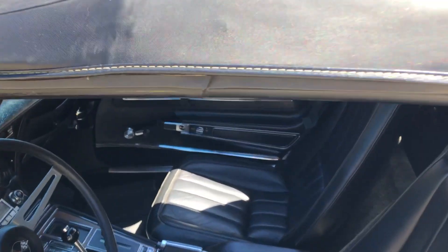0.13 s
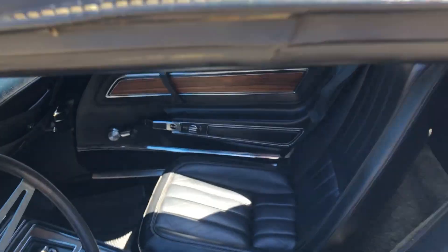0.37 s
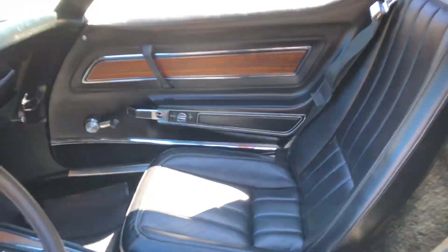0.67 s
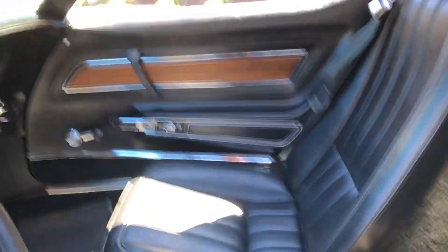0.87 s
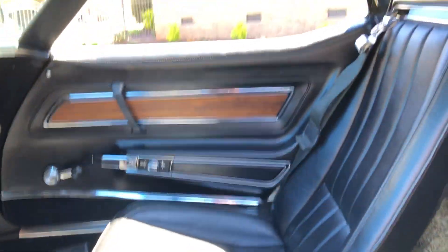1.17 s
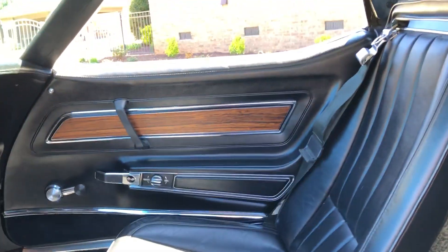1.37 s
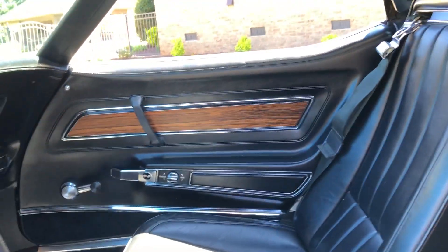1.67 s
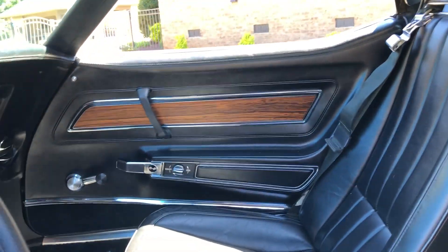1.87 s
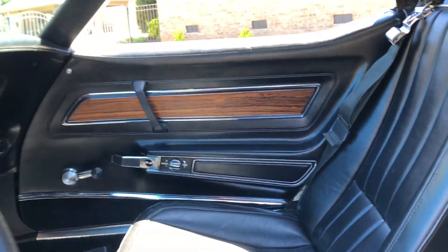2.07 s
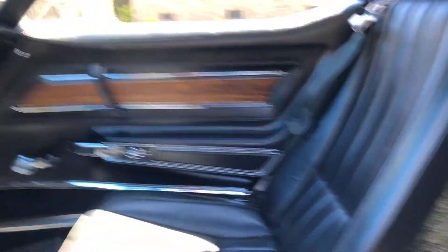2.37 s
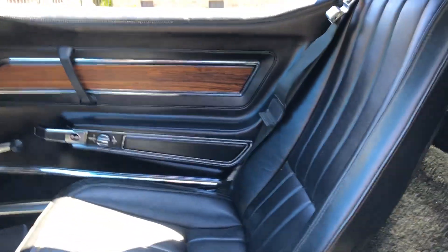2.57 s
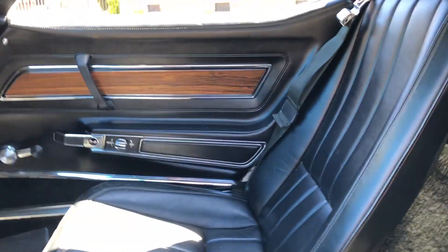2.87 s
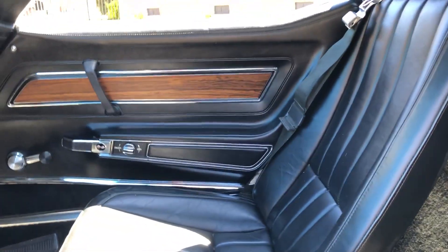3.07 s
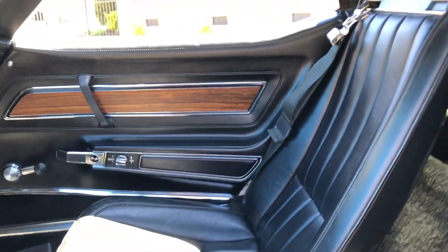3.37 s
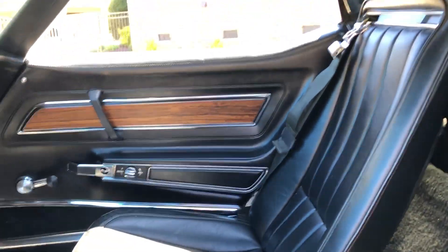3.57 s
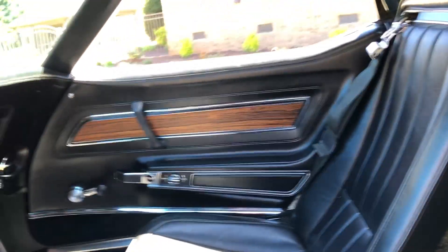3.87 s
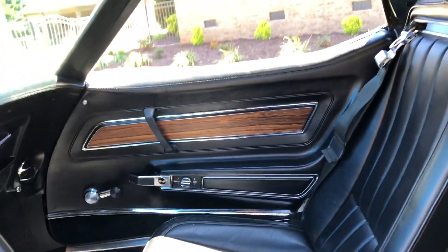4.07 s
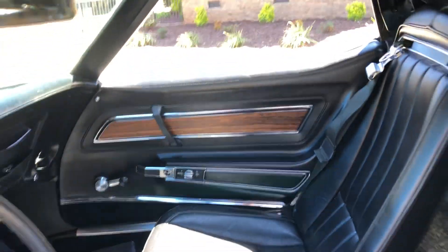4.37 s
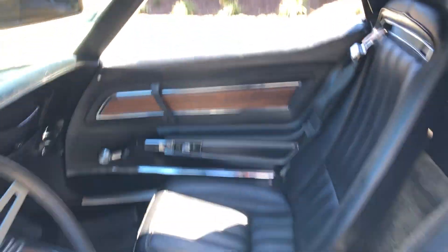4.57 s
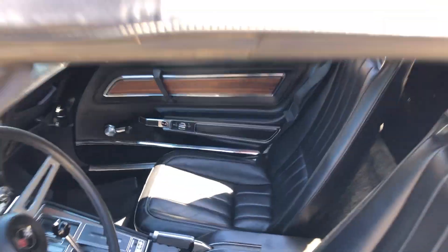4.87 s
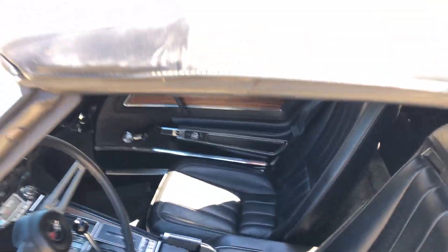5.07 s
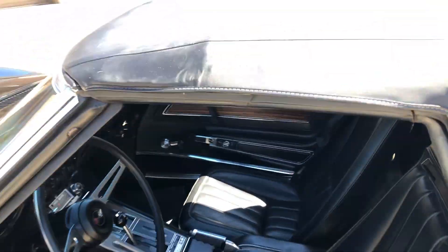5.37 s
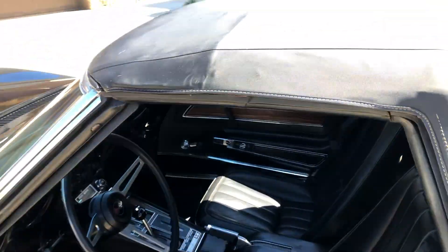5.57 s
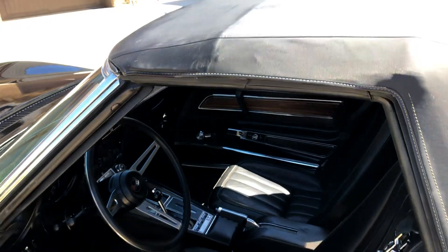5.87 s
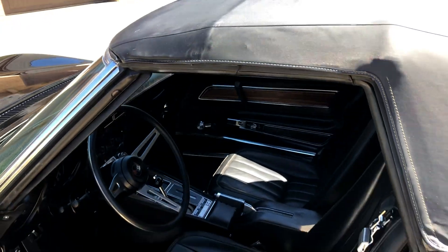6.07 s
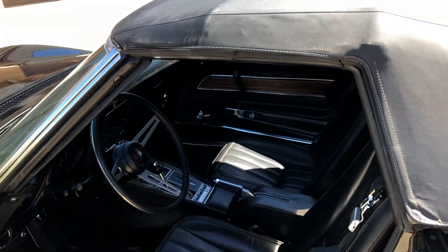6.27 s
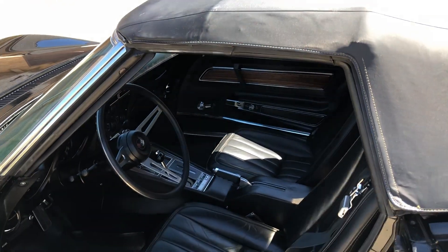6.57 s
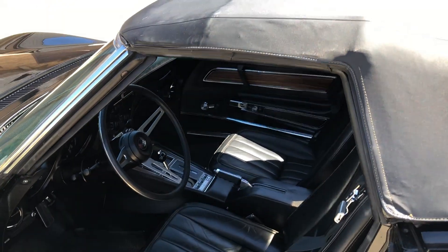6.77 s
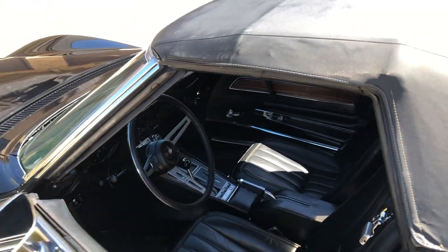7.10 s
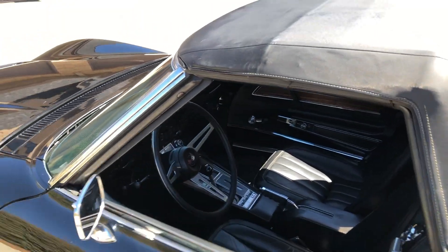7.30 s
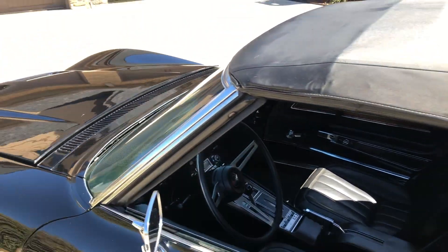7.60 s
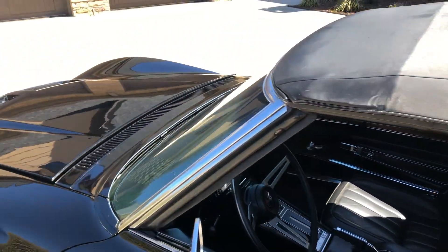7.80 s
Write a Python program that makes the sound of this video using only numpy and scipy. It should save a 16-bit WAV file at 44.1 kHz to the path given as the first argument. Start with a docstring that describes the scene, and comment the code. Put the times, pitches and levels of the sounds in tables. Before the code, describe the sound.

Close small ticks over far traffic rumble, a clattering car door release, faint distant chirps, and finally a loud, heavy door slam.

```python
"""A yard outdoors with hard ground and walls: a heavy car door stands close to the microphone.
Its latch is worked and released, later it is slammed: noise bursts and short notes through resonances.
Hands and feet nearby make small ticks, a fine crackle and a rub; the walls add a short tail.
Far traffic and hiss are shaped noise, a motor hums in sine overtones, an engine pulls away as a
climbing sine, and a small distant bird chirps in arched, roughened whistles."""
import sys
import numpy as np
from scipy import signal
from scipy.fft import rfft, irfft, next_fast_len
from scipy.io import wavfile
from scipy.ndimage import uniform_filter1d, map_coordinates

SR = 44100
rng = np.random.default_rng(int(sys.argv[2]) if len(sys.argv) > 2 else 0)


def int16_out(signal):
    """Quantize to a 16-bit WAV file."""
    q = np.round(np.clip(np.atleast_2d(signal).T, -1, 1) * 32767)
    wavfile.write(sys.argv[1], SR, q.astype(np.int16))


N = 350154  # samples

# Far background. Each row: time in seconds, rumble level in dB, traffic level in dB, hiss level in dB.
AIR_LEVELS = [(0, -51.5, -57.5, -83.5), (.41, -49, -58, -72.5), (.6, -52, -59, -70), (.72, -51, -59.5, -65),
              (1.02, -53.5, -63, -61), (1.41, -55, -63, -68.5), (1.8, -55.5, -66, -77),
              (2.24, -56.5, -62, -70), (2.45, -55, -65.5, -70.5), (3.7, -54.5, -69.5, -74),
              (4.3, -57.5, -66, -69.5), (4.78, -54, -61.5, -70.5), (4.95, -53.5, -64, -75.5),
              (6, -52, -61.5, -77.5), (6.33, -51, -60, -74.5), (6.75, -52, -61, -77.5),
              (7.2, -49, -62, -78.5), (7.4, -52, -60, -77)]
# Spectra of its three layers. Each row: frequency in Hz, relative density in dB per Hz.
RUMBLE_SPECTRUM = [(13, -24.5), (22, -8.5), (75, 0), (97, -3), (150, 0.5), (258, -10), (340, -8),
                   (391, -19.5), (494, -18.5), (600, -29.5), (780, -31.5), (1320, -120)]
TRAFFIC_SPECTRUM = [(210, -37.5), (350, -4.5), (500, -7.5), (665, -4.5), (917, -4), (1040, -6), (1160, -9),
                    (1780, -9.5), (6000, -31), (7800, -56.5), (13200, -120)]
HISS_SPECTRUM = [(1470, -29), (2500, -4), (3590, 2.5), (4360, -1.5), (6410, -0.5), (10100, -3.5),
                 (15100, -6.5), (15800, 0)]

# Overtones of the motor. Each row: multiple of the hum frequency, level in dB before the hum's gains.
HUM_OVERTONES = [(1, -65.5), (4, -78.5), (5, -76.5), (6, -89.5)]
HUM_HZ = 292
# the hum comes forward once
HUM_START_S, HUM_RISE_S, HUM_FAINT_DB, HUM_FULL_DB = 4.3, 0.55, -7, 3.5

# Ticks and scuffs close by. Each row: start in seconds, strength in dB, low part in dB relative to it,
# ring frequency in Hz, t60 of the grit in seconds.
TICKS_NEARBY = [(.2438, -41, -1, 1920, 0.098), (0.3232, -48.5, -12, 4240, 0.093),
                (0.4998, -44.5, -13, 1600, 0.052), (0.6974, -33.5, -8, 2330, 0.031),
                (2.14, -47.5, -1, 2130, 0.034), (2.216, -54, 7, 620, 0.038), (2.2425, -55, 9, 2600, 0.059),
                (3.59, -53, 1.5, 2220, 0.33), (3.6135, -54, -3, 1850, 0.05), (3.6796, -53, -21, 1880, 0.23),
                (3.7717, -48, -22, 3960, 0.086), (4.1904, -54, -23, 2390, .06),
                (4.332, -57, -17, 4060, 0.11), (4.4532, -49.5, -23, 2170, 0.072),
                (4.61, -53, -12, 1760, 0.04), (4.757, -54, -14, 2250, .13), (4.7894, -54.5, -10, 1450, .12),
                (4.847, -49.5, -20, 2320, 0.27), (4.8785, -37, -1.5, 1270, 0.057),
                (5.2413, -49, -10, 1750, 0.15), (5.2587, -41.5, -6, 1590, 0.042),
                (5.3704, -58, -17, 1430, 0.15), (5.742, -54.5, 6, 1350, .088),
                (5.9499, -62.5, 21.5, 820, 0.036), (6.1327, -47.5, 3.5, 1630, 0.06),
                (6.345, -38, -8, 2040, 0.082), (6.3903, -51, -20, 1910, 0.11),
                (6.6339, -38.5, -12, 1880, 0.066)]
# grit, fizz and ring are relative to the strength of the tick
TICK_RISE_S, TICK_GRIT_DB, TICK_FIZZ_DB, TICK_RING_DB = 0.0042, -5.5, -18.5, -6

# Decay of the yard's tail. Each row: frequency in Hz, t60 in seconds.
YARD_DECAY = [(100, 0.54), (1000, 0.56), (4000, 0.33), (12000, 0.23)]

# Door contacts. Each row: start in seconds, strength in dB, metal relative to panel in dB, fine rattle
# relative to metal in dB, t60 of the latch rattle in seconds, clack in Hz, knock in Hz.
DOOR_CONTACTS = [(2.249, -46, -20, -20, 0.052, 1050, 380), (2.5044, -49.5, 15, -28, 0.022, 2030, 510),
                 (2.522, -41.5, 8, -13.5, 0.096, 1670, 655), (2.58, -53, 17.5, -17, .11, 3200, 490),
                 (2.6032, -49, 7, -12, .16, 1850, 650), (2.656, -51, 8, -22, 0.089, 1860, 640),
                 (2.7037, -42.5, 11, -37, 0.06, 2110, 670), (2.73, -39.5, 9, -31, 0.17, 2020, 715),
                 (2.7484, -19.5, 8, -16, 0.063, 2040, 713), (2.7603, -18.5, -15, -10, 0.027, 2300, 500),
                 (2.8097, -28.5, 7.5, -28, 0.097, 2090, 500), (2.8239, -32, 9.5, -22, 0.094, 1550, 690),
                 (2.8451, -30, 4.5, -35, 0.083, 3330, 726), (2.8713, -43.5, 4.5, -16, 0.4, 1730, 575),
                 (3.0714, -43, -12.5, -22, 0.19, 1890, 415), (3.1332, -46, -4, -3, 0.18, 2260, 760),
                 (3.1643, -36.5, 6.5, -8, 0.2, 1980, 587), (3.1695, -24.5, 0.5, -8.5, 0.062, 5450, 724),
                 (3.2053, -31.5, 1.5, -20, 0.026, 2220, 619), (3.25, -44, 10, -33, 0.027, 2010, 660),
                 (7.087, -41.5, 12.5, -19, 0.044, 1545, 1052), (7.099, -41, -14, -20, 0.078, 1500, 715),
                 (7.184, -36, -27, -32, .061, 1950, 492), (7.2048, -40.5, -26, -20, 0.06, 1573, 457),
                 (7.431, -45, -16.5, -26, 0.078, 1750, 493), (7.479, -39.5, 14.5, -12.5, 0.041, 1710, 1185),
                 (7.494, -18.5, 5.5, -23, 0.25, 2520, 933), (7.5112, -12, 13.5, -14.5, 0.066, 2590, 563),
                 (7.5216, -21, 9.5, -4.5, .052, 1604, 543), (7.5338, -18, -7.5, -11.5, 0.092, 1630, 488),
                 (7.5463, -16, 9, -8.5, 0.051, 2550, 885), (7.5563, -13, -5, -7, .057, 1453, 390),
                 (7.564, -27, 2, -3.5, 0.11, 1630, 715), (7.593, -20, 4.5, -12.5, 0.11, 1880, 447),
                 (7.6177, -26, 0.5, -16, .09, 1588, 461), (7.648, -28, -1, -12, .05, 1900, 448)]
RATTLE_DB, CLACK_DB = -12, -10  # latch rattle and latch note relative to the metal level
# Resonances of the outer panel. Each row: frequency in Hz, width in Hz, level in dB.
PANEL_MODES = [(530, 67, 5.5), (699, 150, -11), (911, 38, -21), (1249, 80, -8.5), (1433, 46.5, -10.5),
               (1462, 23, -9.5)]
# Resonances of latch and rods. Each row: frequency in Hz, width in Hz, level in dB.
METAL_MODES = [(2000, 200, -4), (2300, 150, -2), (2600, 200, -3), (3330, 200, -6), (4330, 250, -7),
               (4950, 400, -1), (5980, 250, -6)]
# Resonances of springs and pins. Each row: frequency in Hz, width in Hz, level in dB.
FINE_MODES = [(6900, 400, -1), (10200, 800, -2), (11600, 400, -9)]
# after the release a loose rod chatters evenly and fades; the loss is per knock
CHATTER_S, CHATTER_GAP_S, CHATTER_DB, CHATTER_LOSS_DB = 2.9055, 0.0457, -32, 2
CHATTER_METAL_DB, CHATTER_FINE_DB = 3, -40
CHATTER_T60_S, CHATTER_CLACK_HZ, CHATTER_KNOCK_HZ = 0.084, 2150, 628

# Shell and cabin resonances, the deepest first. Each row: frequency in Hz, width in Hz, level in dB.
BODY_MODES = [(54, 69, 17), (134, 26, 8), (165.6, 44, 5), (190.4, 10, -2), (265, 21, -6), (310, 31, -14),
              (322, 32, 0.5)]
# Heavy blows into the shell. Each row: start in seconds, push in dB before a small random change.
SHELL_THUMPS = [(2.7627, -34), (2.8119, -33.5), (2.8241, -30.5), (2.8713, -36), (2.9506, -40),
                (2.9973, -42), (3.166, -34), (7.106, -47.5), (7.2044, -45), (7.436, -47), (7.5107, -28),
                (7.5204, -22), (7.533, -20), (7.5468, -26), (7.5549, -16), (7.562, -16.5), (7.5844, -18.5),
                (7.6193, -28.5)]
# The door shakes after a jolt and sways on. Each row: start in seconds, jolt in dB, sway in dB,
# time in seconds before the sway falls off.
DOOR_SHUDDER = [(2.74, -29.5, -37, 0.44), (7.601, -14, -48.5, 0.28)]
DEEP_DB = -24.5  # push into the cabin's lowest note for a blow of -19.5 dB
DEEP_GROWS = 1.8  # dB for each dB of the blow
JOLT_DB_PER_S, SWAY_DB_PER_S, SHAKE_RISE_S = 220, 97, 0.018
SWAY_DEEP_DB = -9  # share of the swaying that reaches the cabin's lowest note
# a low note hums on once the door swings free
LOW_S, LOW_HZ, LOW_DB, LOW_T60_S = 3.2, 75, -47, 1.9

# a short run of very fine, thin ticks
CRACKLE_S, CRACKLE_GAP_S, CRACKLE_DB, CRACKLE_T60_S = 4.109, 0.0445, -58, 0.053

# Chirps of the far bird. Each row: start in seconds, top frequency in Hz, level in dB, length in seconds.
BIRD_CHIRPS = [(4.193, 3360, -71, 0.043), (4.447, 3400, -65, 0.039), (4.52, 3310, -75, 0.035),
               (4.604, 2090, -66, 0.046), (4.686, 3280, -67, 0.034), (4.75, 3300, -70, 0.036),
               (4.933, 3300, -62.5, .04), (5.0, 3250, -68, .035), (5.115, 1980, -64, 0.044)]

ENGINE_S, ENGINE_LASTS_S, ENGINE_HZ, CLIMB_HZ_PER_S = 5.5, 1.15, 67, 28
ENGINE_DB, ENGINE_FADE_DB_PER_S, ENGINE_ATTACK_S, ENGINE_RELEASE_S = -49.5, 8.5, 0.12, 0.2

RUB_S = 6.912  # a hand slides along the door, loudest here
RUB_DB, RUB_METAL_DB, RUB_RISE_DB_PER_S, RUB_FALL_DB_PER_S = -55.5, -13.5, 93, 119.5

TOP_HZ = 15900  # band limit of the microphone


def amp(db):
    """Gain of a level in dB."""
    return 10 ** (np.asarray(db) / 20)


def unit(x):
    """x at rms 1."""
    return x / np.sqrt(np.mean(x ** 2) + 1e-20)


def along(points, hz):
    """Read (Hz, value) points on a log frequency axis."""
    f, v = np.transpose(points)
    return np.interp(np.log(hz + 1), np.log(f + 1), v)


def curves(rows):
    """One value per sample for each column after the time."""
    s, *columns = np.transpose(rows)
    return [np.interp(np.arange(N) / SR, s, column) for column in columns]


def wobble(rate):
    """A smooth random curve, rate knots a second."""
    knots = rng.standard_normal(int(N * rate / SR) + 4)
    return map_coordinates(knots, [np.arange(N) * rate / SR])


def filtered(x, response):
    """x through a complex response of frequency, padded so that no ringing wraps round."""
    m = next_fast_len(N + SR)
    return irfft(rfft(x, m) * response(np.fft.rfftfreq(m, 1 / SR)), m)[..., :N]


def peak(f, hz, width):
    """One causal resonance of top gain 1."""
    return 1j * f * width / (hz * hz - f * f + 1j * f * width)


def band(lo_hz, hi_hz, modes):
    """A broad causal band with sharper resonances on it, scaled so that white noise keeps its rms."""
    def response(f):
        broad = peak(f, np.sqrt(lo_hz * hi_hz), hi_hz - lo_hz)
        sharp = sum(amp(db) * peak(f, hz, width) for hz, width, db in modes)
        whole = broad * broad * (broad + sharp)
        return whole / np.sqrt(np.mean(np.abs(whole) ** 2))
    return response


def add(track, s, x):
    """Mix x into track at second s."""
    i = round(s * SR)
    track[..., i:i + x.shape[-1]] += x[..., :N - i]


def burst(t60, rise, grit_db):
    """A contact: a clump of tiny impacts that sets in fast and dies away."""
    t = np.arange(SR // 3) / SR
    steps_db = np.repeat(rng.standard_normal(len(t) // 49 + 1), 49)[:len(t)]  # a new gain every 49 samples
    noise = amp(grit_db * steps_db) * rng.standard_normal(len(t))
    return unit(noise) * amp(-60 * t / t60) * (1 - np.exp(-t / rise))


def ring(hz, t60):
    """The short, slightly blurred note of one struck part: a dying sine of drifting phase."""
    t = np.arange(SR // 10) / SR
    blur = np.cumsum(rng.normal(0, 0.06, len(t)))
    return amp(-60 * t / t60) * np.sin(2 * np.pi * hz * t + blur) * (1 - np.exp(-t / 0.00041))


def voiced(drive, panel=(), metal=(), fine=()):
    """Forces in a low, a middle and a fine range, each through its own resonances."""
    low = filtered(drive[0], band(269.6, 2070, panel))
    middle = filtered(drive[1], band(990, 7500, metal))
    return low + middle + filtered(drive[2], band(4500, 15000, fine))


def rush(spectrum, patchy_db):
    """Shaped noise of rms 1 with smooth time-frequency patches of random gain."""
    z = signal.stft(rng.standard_normal(N), nperseg=512)[2]
    patches = uniform_filter1d(rng.standard_normal(z.shape), size=6, axis=0)
    patches = uniform_filter1d(patches, size=12, axis=1)
    x = signal.istft(z * amp(patchy_db * unit(patches)), nperseg=512)[1][:N]
    return unit(filtered(x, lambda hz: amp(along(spectrum, hz))))


def air():
    """Far traffic as a low and a middle noise layer, and a thin hiss that swells most near one second."""
    rumble_db, traffic_db, hiss_db = curves(AIR_LEVELS)
    low = amp(rumble_db) * rush(RUMBLE_SPECTRUM, patchy_db=0.6)
    middle = amp(traffic_db) * rush(TRAFFIC_SPECTRUM, patchy_db=0.6)
    return low + middle + amp(hiss_db) * rush(HISS_SPECTRUM, patchy_db=0)


def motor_hum():
    """A motor's overtones share one slightly drifting phase, and each wavers in level by itself."""
    t = np.arange(N) / SR
    turn = 2 * np.pi * HUM_HZ * np.cumsum(1 + 0.00152 * wobble(1.6)) / SR
    forward_db = np.interp(t, [HUM_START_S, HUM_START_S + HUM_RISE_S], [HUM_FAINT_DB, HUM_FULL_DB])
    tones = sum(amp(db + 1.5 + 2.5 * wobble(8)) * np.sin(k * turn) for k, db in HUM_OVERTONES)
    return tones * amp(forward_db)


def ticks():
    """Light contacts: each a puff of grit in three ranges with one short ring of its own."""
    drive, notes = np.zeros((3, N)), np.zeros(N)
    for s, db, low_db, hz, t60 in TICKS_NEARBY:
        levels = amp(db) * amp([[low_db], [TICK_GRIT_DB], [TICK_FIZZ_DB]])
        puffs = np.array([burst(t60, TICK_RISE_S, grit_db=1.3) for part in range(3)])
        add(drive, s, levels * puffs)
        add(notes, s, amp(db + TICK_RING_DB) * ring(hz, 0.043))
    return voiced(drive) + notes


def yard(x):
    """Walls answer with noise whose every frequency dies at its own speed."""
    out, t = np.zeros(N), np.arange(N) / SR
    for part in (t < 5, t >= 5):  # sounds before and after 5 s each meet their own random tail
        hz, s, z = signal.stft(rng.standard_normal(SR // 2 + SR // 4), SR, nperseg=256)
        decay = amp(-60 * s / along(YARD_DECAY, hz)[:, None])
        tail = signal.istft(z * decay, SR, nperseg=256)[1]
        delayed = np.pad(x * part, (400, 0))  # samples, about 9 ms
        out += signal.fftconvolve(delayed, tail / np.linalg.norm(tail))[:N]
    return out


def door_contacts():
    """Every contact rattles panel, latch and springs with noise, and adds a clack and a knock."""
    drive, notes = np.zeros((3, N)), np.zeros(N)
    chatter = [(CHATTER_S + k * CHATTER_GAP_S, CHATTER_DB - k * CHATTER_LOSS_DB, CHATTER_METAL_DB,
                CHATTER_FINE_DB, CHATTER_T60_S, CHATTER_CLACK_HZ, CHATTER_KNOCK_HZ) for k in range(4)]
    for s, db, metal_over_db, fine_db, t60, clack_hz, knock_hz in DOOR_CONTACTS + chatter:
        metal_db = db + metal_over_db
        panel = amp(db) * burst(1.296 * t60, 0.0038, grit_db=2)
        latch = amp(metal_db + RATTLE_DB) * burst(t60, 0.0012, grit_db=-1.0)
        springs = amp(metal_db + fine_db) * burst(0.62 * t60, 0.0026, grit_db=4.0)
        add(drive, s, np.array([panel, latch, springs]))
        add(notes, s, amp(metal_db + CLACK_DB) * ring(clack_hz, 0.04) + amp(db) * ring(knock_hz, 0.074))
    return voiced(drive, PANEL_MODES, METAL_MODES, FINE_MODES) + notes


def door_shell():
    """Heavy blows and noisy shaking push on the shell and on the cabin's lowest resonance."""
    push, t = np.zeros((2, N)), np.arange(N) / SR  # rows: shell, lowest note
    shove = signal.windows.hann(SR // 400)  # rubber seals spread a blow over a few milliseconds
    for s, db in SHELL_THUMPS:
        deep_db = DEEP_DB + DEEP_GROWS * (db + 19.5)
        add(push, s, amp([[db], [deep_db]]) * amp(rng.normal(0, 1)) * -shove)
    for s, jolt_db, sway_db, lasts in DOOR_SHUDDER:
        jolt = amp(jolt_db - JOLT_DB_PER_S * abs(t - s))
        sway = amp(sway_db - SWAY_DB_PER_S * np.maximum(t - s - lasts, 0))
        rise = np.clip((t - s) / SHAKE_RISE_S, 0, 1)
        shake = rise * amp(1.9 * wobble(25)) * rng.standard_normal((2, N))
        push += shake * [jolt + sway, amp(SWAY_DEEP_DB) * sway]
    return filtered(push[0], band(60, 450, BODY_MODES[1:])) + filtered(push[1], band(34, 120, BODY_MODES[:1]))


def low_note():
    """A deep sine of the freed door, dying slowly with a wavering level."""
    u = np.maximum(np.arange(N) / SR - LOW_S, 0)
    level = amp(LOW_DB - 60 * u / LOW_T60_S + 3 * wobble(14)) * (1 - np.exp(-u / 0.02))
    return level * np.sin(2 * np.pi * LOW_HZ * u)


def crackle():
    """Seven fine ticks, nearly even in time, with force in the fine range only."""
    drive = np.zeros((3, N))
    for k in range(7):
        late, db = rng.normal(0, [0.004, 2.5]) * (k > 0)  # seconds and dB; the first tick is exact
        tick = burst(CRACKLE_T60_S, TICK_RISE_S, grit_db=-1.5)
        add(drive[2], CRACKLE_S + k * CRACKLE_GAP_S + late, amp(CRACKLE_DB + db) * tick)
    return voiced(drive)


def bird():
    """Short whistles that arch up and down, roughened by the distance."""
    out = np.zeros(N)
    for s, top_hz, db, length in BIRD_CHIRPS:
        u = np.linspace(-1, 1, round(length * SR))
        hz = top_hz * (1 - 0.14 * u * u) + rng.normal(0, 500, len(u))
        add(out, s, amp(db) * np.sqrt(1 - u * u) * np.sin(2 * np.pi * np.cumsum(hz) / SR))
    return out


def engine():
    """An engine pulls away: its firing tone is a sine that climbs while its level falls."""
    u = np.arange(N) / SR - ENGINE_S
    near = np.clip(np.minimum(u / ENGINE_ATTACK_S, 1 + (ENGINE_LASTS_S - u) / ENGINE_RELEASE_S), 0, 1)
    hz = ENGINE_HZ + CLIMB_HZ_PER_S * np.clip(u, 0, ENGINE_LASTS_S)
    level = near * amp(ENGINE_DB - ENGINE_FADE_DB_PER_S * u + 1.5 * wobble(9))
    return level * np.sin(2 * np.pi * np.cumsum(hz) / SR)


def rub():
    """A sliding hand: unsteady friction noise in the low and middle ranges swells and falls."""
    drive, t = np.zeros((3, N)), np.arange(N) / SR
    slope = np.where(t < RUB_S, RUB_RISE_DB_PER_S, RUB_FALL_DB_PER_S)
    level = amp(RUB_DB - slope * abs(t - RUB_S) + 4.1 * wobble(44))
    drive[:2] = level * amp([[0], [RUB_METAL_DB]]) * rng.standard_normal((2, N))
    return voiced(drive)


def scene():
    """Close door and hands, and the far bird, with their tail from the yard over the background."""
    door = door_contacts() + door_shell() + low_note()
    near = ticks() + door + crackle() + rub()
    far = bird()
    tail = yard(amp(-17) * near + amp(-7.5) * far)
    return (near + far + tail + air() + motor_hum() + engine())[None]


def record(dry):
    """The microphone rolls off deep bass, rounds peaks near full scale and cuts above its band limit."""
    def bass_rolloff(f):
        return (1j * f) ** 2 / (36 ** 2 - f * f + 1.3j * f * 36) * 1j * f / (30 + 1j * f)
    x = filtered(dry, bass_rolloff)
    x = x / (1 + np.abs(x / 0.85) ** 6) ** (1 / 6)
    return filtered(x, lambda hz: hz < TOP_HZ)


dry = scene()
out = record(dry)
int16_out(out)
```